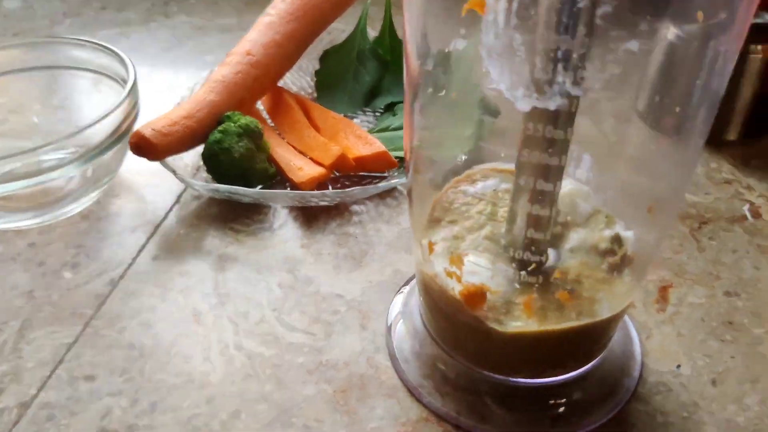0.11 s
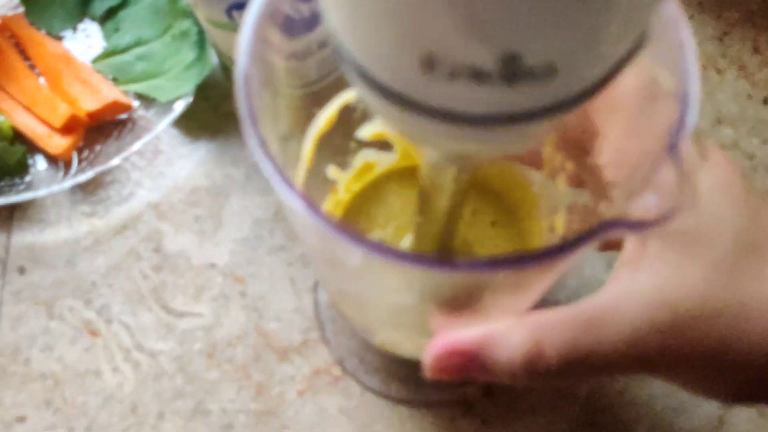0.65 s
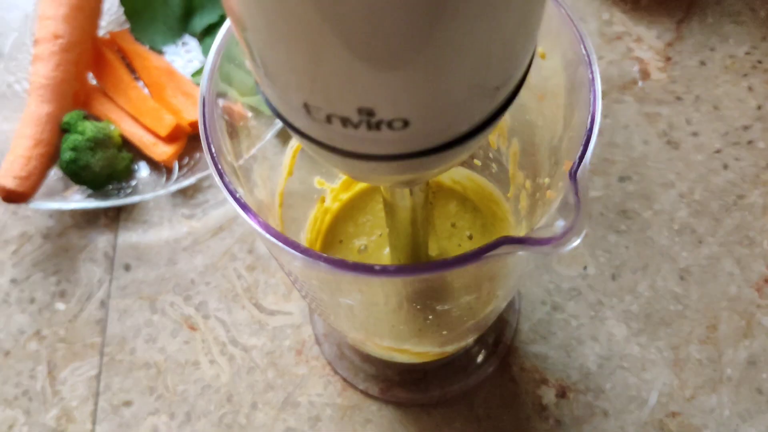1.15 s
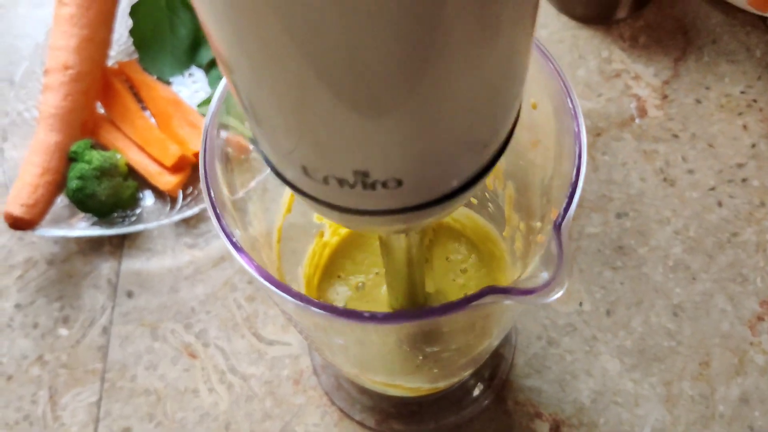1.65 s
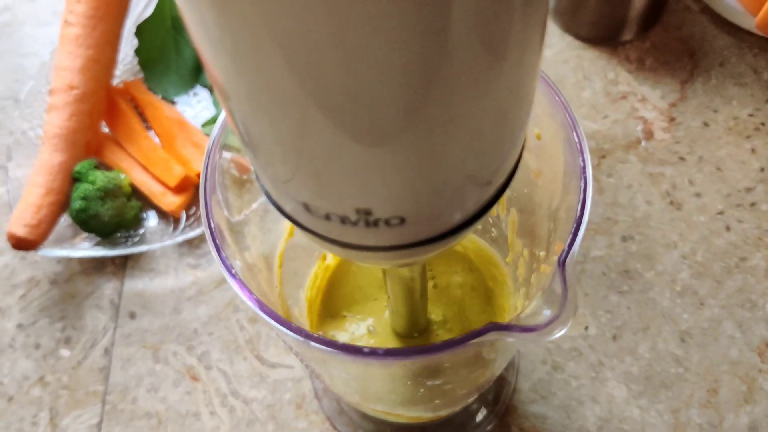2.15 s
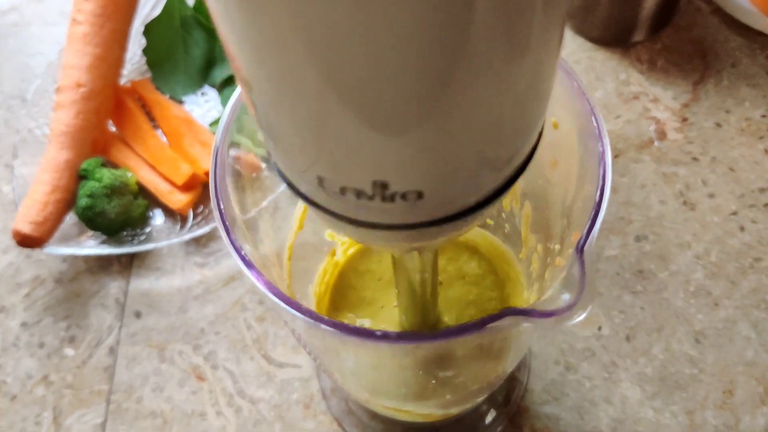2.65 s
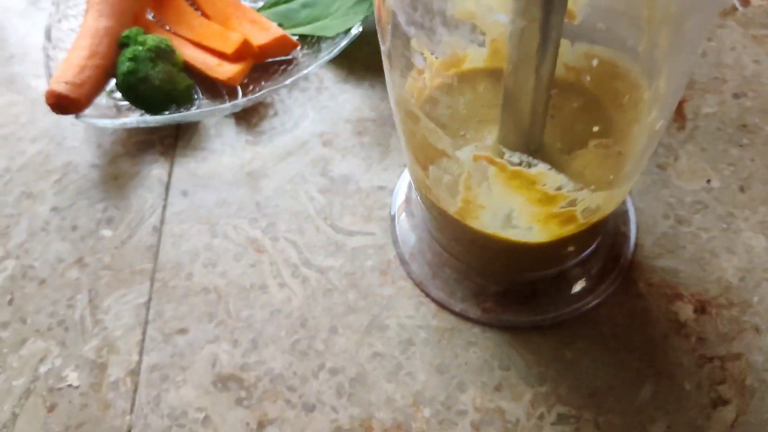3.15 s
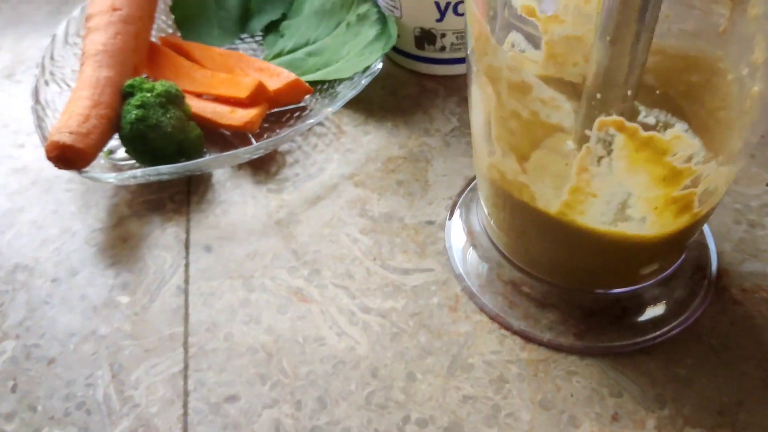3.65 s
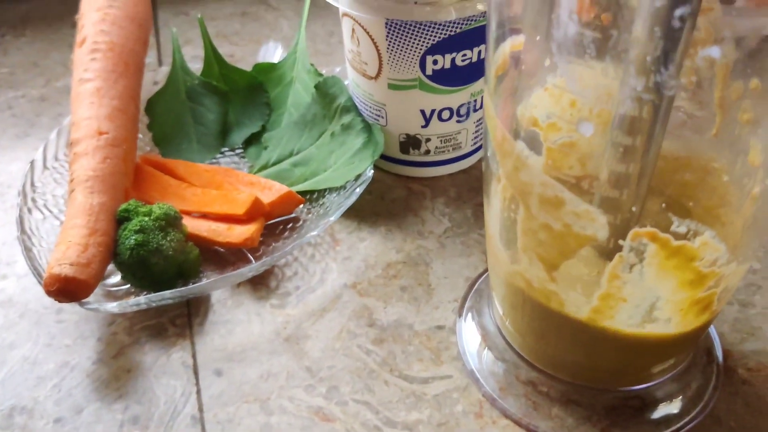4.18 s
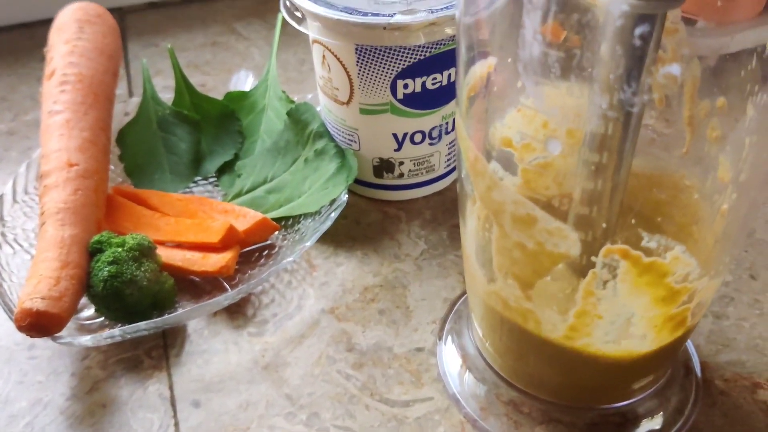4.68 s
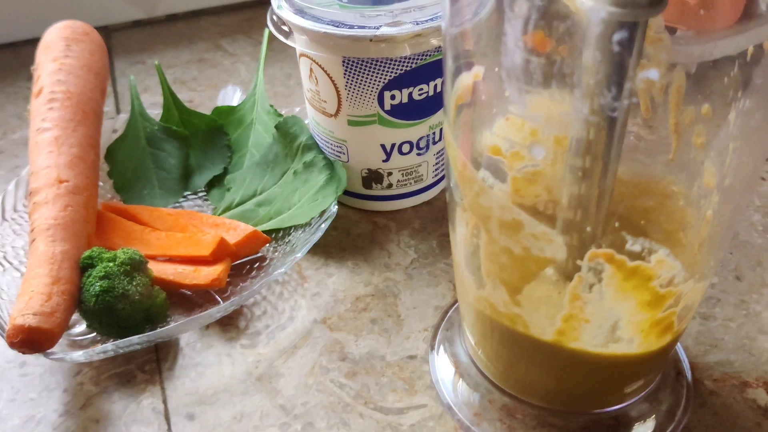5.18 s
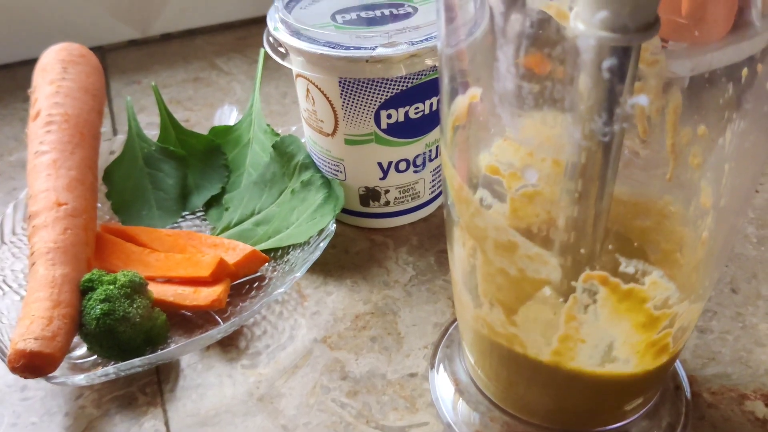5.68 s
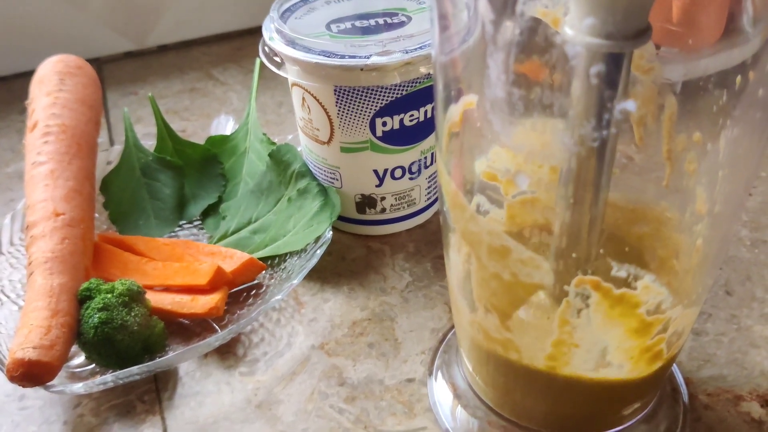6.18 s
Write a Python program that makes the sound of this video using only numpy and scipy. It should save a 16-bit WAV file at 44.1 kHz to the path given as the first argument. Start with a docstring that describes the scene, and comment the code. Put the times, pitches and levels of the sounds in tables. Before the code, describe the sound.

A short, rumbling blender noise drops away into near-silence, broken by tiny cutouts and a barely audible brush and tapping of fingers on a plastic beaker. After about a second and a half the blender fades up and keeps whirring without stopping. Its midrange drone wavers and booms in the beaker over churning puree, airy treble hiss and low counter rumble. Recorded close on a kitchen counter, in stereo.

```python
"""On a kitchen counter, a hand blender purees vegetables in a plastic beaker: a short burst is faded out,
the quiet room is faded in and out while a hand brushes and taps the beaker, then a long run is faded in.
Sine waves make the motor shaft's hum, filtered noise makes the ringing beaker, churning puree, hiss and rumble.
Short tones make hard bits ticking on the wall; the room is soft noise with steady tones and a thin whine.
Brief narrow gaps are left in the treble heard with the blender, and the sound cuts out twice before the run."""
import sys
import numpy as np
from scipy import signal
from scipy.fft import rfft, irfft, next_fast_len
from scipy.io import wavfile
from scipy.ndimage import uniform_filter1d, map_coordinates

SR = 44100
rng = np.random.default_rng(int(sys.argv[2]) if len(sys.argv) > 2 else 0)


def unload_audio(sound):
    """Save the sound as a 16-bit wav file, at the path given as the first command line argument."""
    columns = np.transpose(np.atleast_2d(sound))
    # keep every value between -1 and 1, then stretch to whole-number steps
    steps = np.round(np.clip(columns, -1, 1) * 32767)
    wavfile.write(sys.argv[1], SR, steps.astype(np.int16))


def voltage_ratio(level):
    """Linear amplitude factor for a level in decibels (scalar or array-like)."""
    return 10 ** (np.asarray(level, float) / 20)


N = 278271

# Turning speed of the shaft, dragged by the puree: (time [s], speed [turns per s])
SHAFT_SPEED = [(1.56, 238), (1.78, 253), (2.08, 255.5), (2.26, 263.7), (2.42, 265.8), (2.65, 263.5),
               (3.1, 264), (3.4, 261.2), (3.86, 259.8), (4.0, 262), (4.18, 271.3), (4.32, 271.6),
               (4.52, 268.5), (4.9, 266), (5.3, 266.2), (6.31, 263.9)]
# Hum of the shaft, orders being multiples of its speed: (order, level heard from above [dB],
# level heard from the side [dB], power of the run's fade-in that it follows)
SHAFT_HUM = [(1, -29.5, -30, 1.54), (2, -23, -22.5, 2.8), (3, -34, -32, 2.9), (4, -37.5, -35, 1.2),
             (5, -30, -32, 1.16)]
# An order of the hum grows or sinks for a while: (order, time [s], half length [s], change [dB])
HUM_CHANGES = [(1, 2.2, 0.11, 4), (1, 2.69, 0.45, -10), (1, 3.67, 0.19, 1.5), (1, 6.17, 0.28, -5),
               (2, 3.22, 0.29, 3), (2, 4.67, 0.22, 5.5), (2, 6.2, 0.16, 3.5), (2, 7.4, 0.077, 3),
               (3, 5.96, 0.23, 4), (5, 1.95, 0.12, 6), (5, 5.6, .2, 0)]
# Moments where the beaker's ring booms up or drops away: (time [s], change [dB])
RING_BOOMS = [(1.59, 7), (1.83, 5), (2.02, 9), (2.13, 6), (2.49, 8), (2.7, -21), (3.038, 6.5), (3.23, 9),
              (3.67, -36), (4.66, 5), (4.78, 6), (4.94, 6.5), (5.39, 2), (5.511, 11.5), (5.94, -20),
              (6.1, 10), (6.24, 14)]
# Resonances of the beaker: (frequency [Hz], width [Hz], relative level [dB])
BEAKER_RESONANCES = [(494.3, 84, 1), (544.9, 26, 2), (549, 25, -4)]
# Rises and dips in the colour of churn and hiss: (frequency [Hz], width [Hz], change [dB])
RISES_AND_DIPS = [(820, 49, 0.5), (1260, 80, 2.5), (1670, 170, 5.5), (2120, 60, -3.5), (2340, 180, 6),
                  (2773, 426, 7), (3200, 154, -5), (3718, 107, 7.5), (4390, 66, -1), (4235, 54, 5),
                  (4700, 29, 8), (4900, 110, -3.5), (5750, 430, 6), (6320, 170, -8), (6910, 81, 5.5),
                  (8480, 150, 5), (8700, 200, -3.5), (9270, 260, -5), (12230, 400, 1), (14100, 400, -4),
                  (14700, 480, 10.5)]
# Tone colour of the churning puree: (frequency [Hz], relative level [dB])
CHURN_COLOUR = [(150, -32.5), (250, -18.5), (344, -19.5), (536, -3), (675, -14), (806, -8.5), (2330, -15),
                (3500, -16), (4550, -36), (7700, -120)]
# Tone colour of the housing's hiss: (frequency [Hz], relative level [dB])
HISS_COLOUR = [(2000, -28), (3000, -7.5), (4000, -2.5), (5500, -1.5), (7500, -9), (10000, -10),
               (12000, -13), (13500, -11.5), (15300, -15.5)]
# Tone colour of the shaking counter: (frequency [Hz], relative level [dB])
RUMBLE_COLOUR = [(15, -41), (25, -17), (59, 1), (156, -2), (220, -3.5), (230, -0.5), (300, -16),
                 (510, -120)]
# Hard bits hitting the wall: (time [s], level before the 5 dB boost and soft onset [dB], frequency [Hz])
HARD_BITS = [(2.11, 3, 5370), (3.9584, -6, 5360), (4.0272, -5, 4100), (4.6773, -23, 5750),
             (4.8434, -9, 5830), (5.192, -5, 5700)]
# How alike left and right are in the noises: (frequency [Hz], likeness [0 to 1])
LIKENESS = [(60, 1), (180, 0.88), (550, 0.72), (1400, 0.31), (3000, 0.43), (7000, 0.2), (15000, 0.1)]
# Left over right at the two microphone ports: (frequency [Hz], difference [dB])
PORT_TILT = [(60, -1.5), (110, 2), (200, -5.5), (380, -4), (700, -5.5), (1290, -2.5), (2380, -1.5),
             (4400, 2), (8120, -5.5), (15000, 5.5)]
# How far the left port leads the right: (frequency [Hz], lead [radians])
PORT_LEAD = [(0, 0), (1640, -0.25), (3190, -2.5), (3530, -2.5), (4650, -0.75), (5510, -4.5), (5860, -7.5),
             (8610, -3.5), (9220, -9.5), (9820, 6.5), (11500, 17), (13300, 8), (14000, 3.5), (15900, 6)]
# The quiet room's fades: (time [s], level of the room tone [dB], level of the whine [dB])
KITCHEN_LEVELS = [(.08, -48, -70), (.12, -55.5, -65), (.235, -63.5, -80), (.265, -81, -84),
                  (.345, -69, -79), (.38, -84, -90), (.5, -70, -85), (.73, -61, -72), (.83, -62, -67),
                  (1.0, -66, -75), (1.1, -74, -82), (1.25, -79, -96), (1.54, -88, -97)]
# Tone colour of the room: (frequency [Hz], relative level [dB])
ROOM_COLOUR = [(15, -29), (25, 0.5), (80, -9.5), (145, -5.5), (190, -26), (243, -14), (331, -22),
               (624, -24), (728, -29), (2500, -38), (3250, -80), (5500, -120)]
# Steady tones of an appliance: (frequency [Hz], level over the room tone [dB])
APPLIANCE_TONES = [(242, -8), (480, -22), (635, -15.5), (2600, -28)]
# Tone colour of the rustling hand: (frequency [Hz], relative level [dB])
RUSTLE_COLOUR = [(880, -41), (1500, -15), (1610, -15), (3910, -1.5), (4230, 0), (9510, -9), (15500, -12)]
# Fingers on the beaker: (time [s], level [dB])
FINGER_TAPS = [(0.744, -57), (0.821, -56)]
# Ring of the tapped wall: (frequency [Hz], level within a tap [dB], time to fall 60 dB [s])
WALL_RING = [(400, -4, .05), (904, 0, .05), (1170, -6, .04), (1600, -8, 0.046), (1950, -12, .035),
             (2611, -7, .035), (3100, -8, .035)]
# The sound cuts out briefly: (start [s], end [s])
CUTS = [(.24, .26), (.356, .373)]


def unit(x):
    """Scales a sound to an average (rms) strength of 1."""
    return x / np.sqrt(np.mean(x ** 2) + 1e-20)


def along(points, hz):
    """Reads a (frequency, value) table, in straight lines on a log frequency axis."""
    f, v = np.transpose(points)
    return np.interp(np.log(hz + 1), np.log(f + 1), v)


def curves(rows):
    """Gives one value per sample for each column after the time."""
    times, *columns = np.transpose(rows)
    return [np.interp(np.arange(N) / SR, times, column) for column in columns]


def wobble(rate):
    """A smooth random curve with rate random points a second."""
    points = rng.standard_normal(int(N * rate / SR) + 4)
    return map_coordinates(points, [np.arange(N) * rate / SR])


def bumps(rows):
    """Adds up rounded rises and dips, given as (time [s], half length [s], change [dB])."""
    t = np.arange(N) / SR
    return sum(db * np.exp(-((t - s) / half) ** 2) for s, half, db in rows)


def filtered(x, response):
    """Changes the strength and phase of each frequency by a response."""
    m = next_fast_len(N + SR // 2)
    return irfft(rfft(x, m) * response(np.fft.rfftfreq(m, 1 / SR)), m)[..., :N]


def patches(shape, bands, frames):
    """Random values smoothed over neighbouring frequency bands and time frames, rms 1."""
    field = uniform_filter1d(rng.standard_normal(shape), size=bands, axis=0)
    return unit(uniform_filter1d(field, size=frames, axis=1))


def pair(patchy_db):
    """Left and right noise, more alike in the bass than in the treble, with patches of random gain."""
    z = signal.stft(rng.standard_normal((2, N)), nperseg=1024)[2]
    patchy = z * voltage_ratio(patchy_db * patches(z.shape[1:], bands=4, frames=4))
    both = signal.istft(patchy, nperseg=1024)[1][:, :N]

    def shares(hz):
        # The shared and opposite parts are mixed so that left and right get the wanted likeness.
        turn = np.arccos(np.clip(along(LIKENESS, hz), -1, 1)) / 2
        return np.array([np.cos(turn), np.sin(turn)])

    mid, side = filtered(both, shares)
    return np.array([mid + side, mid - side])


def coloured(x, colour, changes=()):
    """Gives a sound a tone colour with rounded rises and dips, then an rms of 1."""
    def response(hz):
        change = sum(db / (1 + (2 * (hz - centre) / width) ** 2) for centre, width, db in changes)
        return voltage_ratio(along(colour, hz) + change)
    return unit(filtered(x, response))


def struck(rows, ring):
    """Adds one ring at each row's time."""
    out = np.zeros(N + SR)
    for row in rows:
        sound = ring(*row[1:])
        out[round(row[0] * SR):][:len(sound)] += sound
    return out[:N]


def shaft_hum(angle, run, lowered, booms_db):
    """The turning shaft hums at multiples of its speed; the second also follows the beaker's booms."""
    hum = np.zeros(N)
    for order, above_db, side_db, fade_power in SHAFT_HUM:
        db = above_db + (side_db - above_db) * lowered
        db = db + bumps([row[1:] for row in HUM_CHANGES if round(row[0]) == order])
        db = db + 1.34 * wobble(4.08) + 1.24 * wobble(18)
        if order == 2:
            db = db + 0.39 * booms_db  # this order lies inside the beaker's ring
        wave = np.sqrt(2) * np.sin(int(order) * angle + rng.uniform(0, 2 * np.pi))
        hum += run ** fade_power * voltage_ratio(db) * wave
    return hum


def beaker_ring(booms_db):
    """The beaten puree rings the beaker: unsteady noise passes its resonances and booms up or drops."""
    def resonance(hz):
        total = sum(voltage_ratio(db) * 1j * hz * width / (centre ** 2 - hz ** 2 + 1j * hz * width)
                    for centre, width, db in BEAKER_RESONANCES)
        return total ** 2  # squaring makes the ring narrower
    noise = pair(patchy_db=2.0) * voltage_ratio(1.4 * wobble(30))
    return voltage_ratio(-25 + booms_db) * unit(filtered(noise, resonance))


def blade_pulse(angle, once, twice):
    """The two blades make noise pulse once and twice per turn of the shaft."""
    return 1 + once * np.cos(angle) + twice * np.cos(2 * angle)


def puree_churn(angle, surge):
    """The churning puree is coloured noise that pulses with the blades."""
    noise = pair(patchy_db=2.0) * blade_pulse(angle, 0.2, 0.22)
    gain = voltage_ratio(-17 + 0.075 * surge + 0.13 * wobble(4.58))
    return gain * coloured(noise, CHURN_COLOUR, RISES_AND_DIPS)


def housing_hiss(angle, surge):
    """The housing hisses: bright noise pulses with the blades and flutters in level."""
    noise = pair(patchy_db=2.0) * blade_pulse(angle, 0.098, 0.15)
    gain = voltage_ratio(-22 + 0.86 * surge + 0.75 * wobble(45))
    return gain * coloured(noise, HISS_COLOUR, RISES_AND_DIPS)


def counter_rumble(burst, run):
    """The shaking counter rumbles as low noise; the burst shakes it harder."""
    strength = burst * voltage_ratio(13) + run
    gain = strength * voltage_ratio(-38.5 + 2.2 * wobble(12))
    return gain * coloured(pair(patchy_db=1.5), RUMBLE_COLOUR)


def treble_gaps(x):
    """Leaves brief narrow gaps in the treble at random, the same on left and right."""
    depth_db, edge, from_hz = 26, 0.7, 2600  # depth: loss per unit that chance falls below -edge
    hz, _, z = signal.stft(x, SR, nperseg=1024)
    chance = patches(z.shape[1:], bands=3, frames=7)
    gaps_db = depth_db * np.minimum(chance + edge, 0) * (hz[:, None] > from_hz)
    return signal.istft(z * voltage_ratio(gaps_db), SR, nperseg=1024)[1][:, :N]


def blender():
    """One motor drives hum, ring, churn, hiss and rumble: noise alone in the burst, all in the run."""
    t = np.arange(N) / SR
    # The burst starts 19.5 dB under the full level and is faded out by 249 dB per second.
    burst = voltage_ratio(-19.5 - 249 * t) * (t < 0.21)
    run_starts_s, toe_s, fade_in_s = 1.552, 0.004, 0.38  # toe: the soft first moment
    since_start_s = toe_s * np.logaddexp(0, (t - run_starts_s) / toe_s)
    run = 1 - np.exp(-since_start_s / fade_in_s)
    level = burst + run
    # From 2.9 to 3.6 s the microphone sinks from above the beaker to its side.
    lowered = np.interp(t, (2.9, 3.6), [0, 1])
    angle = 2 * np.pi * np.cumsum(curves(SHAFT_SPEED)[0] + 1.141 * wobble(25)) / SR
    booms_db = bumps([(s, 0.02, db) for s, db in RING_BOOMS]) + 0.78 * wobble(12)
    surge = wobble(9)  # lumps passing the blades
    hum = shaft_hum(angle, run, lowered, booms_db)
    body = hum + level * (beaker_ring(booms_db) + puree_churn(angle, surge))
    # Left over right goes from 2.5 to 1 dB as the microphone sinks, swaying a little.
    sway = voltage_ratio(np.interp(lowered, [0, 1], (2.5, 1)) + 0.51 * wobble(5.3))
    body = body * sway ** np.array([[0.5], [-0.5]])
    hiss = level * housing_hiss(angle, surge)
    return treble_gaps(body + hiss + counter_rumble(burst, run))


def hard_bits():
    """Hard bits tick against the beaker wall: short tones start softly and die away fast."""
    t = np.arange(SR // 100) / SR

    def tick(db, hz):
        fade = voltage_ratio(db + 5 - 60 * t / 0.0048)  # falls 60 dB in 4.8 ms
        onset = 1 - np.exp(-t / 0.00053)
        return fade * onset * np.sin(2 * np.pi * hz * t)

    return struck(HARD_BITS, tick)


def counter_thrum():
    """The counter still rings from the short burst: a low tone dies away."""
    hz, db, t60_s = 79, -33.5, 0.22  # t60: time to fall 60 dB
    t = np.arange(N) / SR
    return voltage_ratio(db - 60 * t / t60_s) * np.sin(2 * np.pi * hz * t)


def hand_rustle(room_gain):
    """A hand brushes the beaker with bright noise; a faint rustle also follows the room tone."""
    t = np.arange(N) / SR
    start_s, end_s, attack_s, release_s = 0.572, 0.83, 0.012, 0.015
    rise = np.clip((t - start_s) / attack_s, 0, 1)
    stroke = rise * np.exp(-np.maximum(t - end_s, 0) / release_s)
    stroke_level = voltage_ratio(np.interp(t, (start_s, end_s), (-68.5, -63.5)))
    gain = stroke * stroke_level + room_gain * voltage_ratio(-14)
    return gain * voltage_ratio(1.9 * wobble(40.6)) * coloured(pair(patchy_db=0.0), RUSTLE_COLOUR)


def finger_taps():
    """Fingers tap the beaker: each tap rings the wall's tones under a fading scuff of noise."""
    t = np.arange(SR // 10) / SR

    def tap(db):
        ring = sum(voltage_ratio(tone_db + rng.normal(0, 2) - 60 * t / t60_s) * np.sin(2 * np.pi * hz * t)
                   for hz, tone_db, t60_s in WALL_RING)
        scuff = uniform_filter1d(rng.standard_normal(len(t)), size=9) * voltage_ratio(-1 - 60 * t / 0.07)
        return voltage_ratio(db) * (ring + scuff)

    return struck(FINGER_TAPS, tap)


def kitchen():
    """The quiet room, faded in and out: soft noise with an appliance's tones, a thin whine, and the hand."""
    t = np.arange(N) / SR
    heard = (t >= KITCHEN_LEVELS[0][0]) * (t < KITCHEN_LEVELS[-1][0])
    room_gain, whine_gain = voltage_ratio(curves(KITCHEN_LEVELS)) * heard
    tones = sum(voltage_ratio(db + 2.5 * wobble(19)) * np.sin(2 * np.pi * hz * t) for hz, db in APPLIANCE_TONES)
    room = room_gain * (coloured(pair(patchy_db=0.5), ROOM_COLOUR) + tones)
    whine_wave = np.sin(2 * np.pi * 4269 * t + 0.5 * wobble(39.4))
    whine = whine_gain * voltage_ratio(2.5 * wobble(29.6)) * whine_wave
    return room + whine + hand_rustle(room_gain) + finger_taps()


def scene():
    """Blender, hard bits and thrum get the left-right difference of the two ports; the room is added."""
    def ports(hz):
        half_tilt = voltage_ratio(along(PORT_TILT, hz) / 2)
        half_lead = np.exp(0.5j * np.interp(hz, *np.transpose(PORT_LEAD)))
        return (half_tilt * half_lead) ** np.array([[1], [-1]])  # left, then its inverse on the right
    return filtered(blender() + hard_bits() + counter_thrum(), ports) + kitchen()


def top_cut(x):
    """Nothing passes above the cut-off."""
    return signal.sosfilt(signal.butter(12, 16400, fs=SR, output="sos"), x)


def record(dry):
    """Cuts the sound out twice and removes the highest treble."""
    t = np.arange(N) / SR
    cut = sum((t > start) & (t < end) for start, end in CUTS)
    gate = 1 - uniform_filter1d(1. * cut, size=150)  # softened edges
    # The treble fades out over the last 150 Hz below 15800 Hz.
    mix = filtered(dry * gate, lambda hz: np.clip((15800 - hz) / 150, 0, 1))
    return top_cut(mix)


dry = scene()
out = record(dry)
unload_audio(out)
```